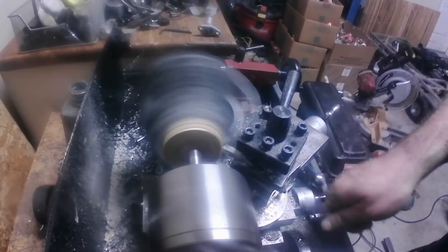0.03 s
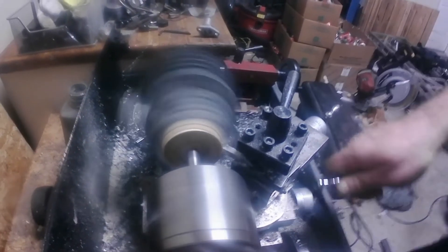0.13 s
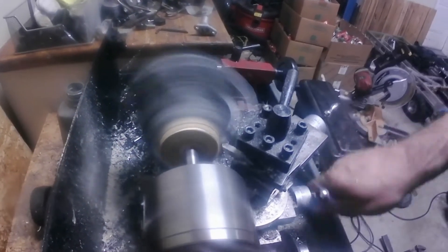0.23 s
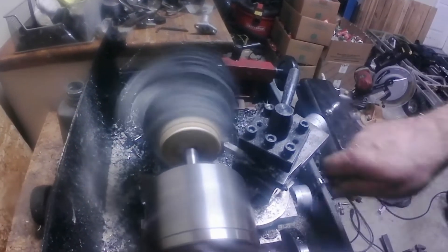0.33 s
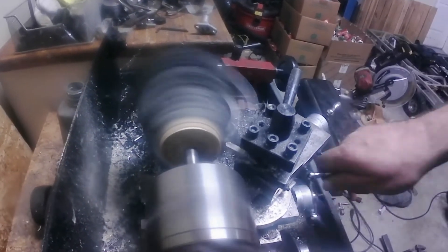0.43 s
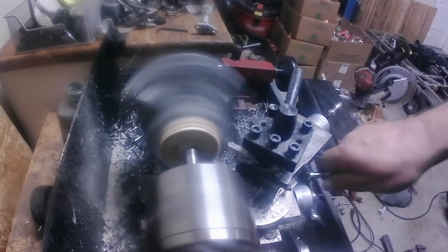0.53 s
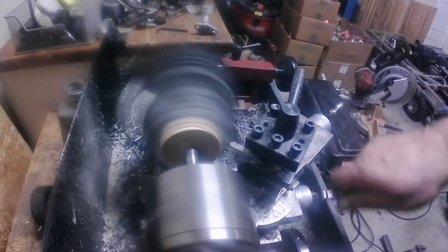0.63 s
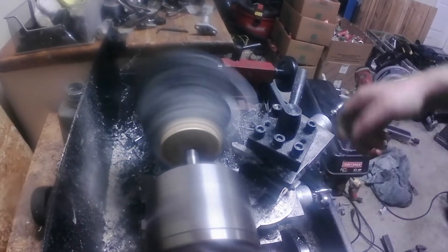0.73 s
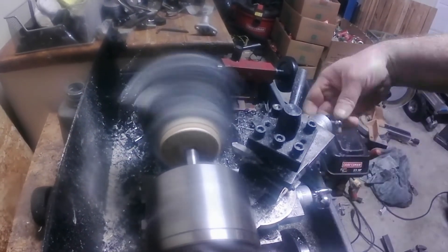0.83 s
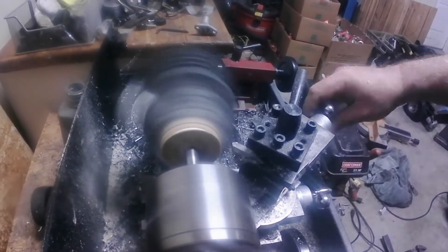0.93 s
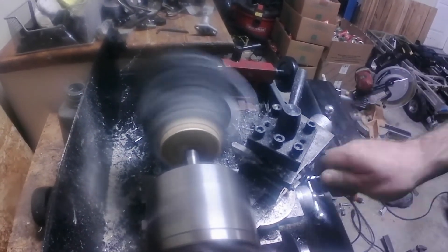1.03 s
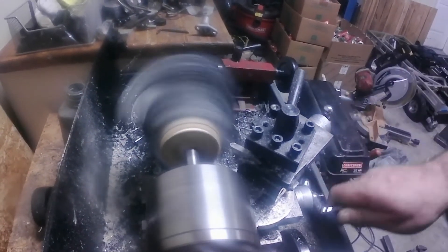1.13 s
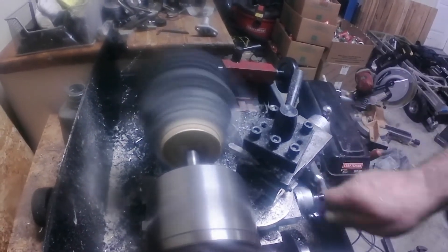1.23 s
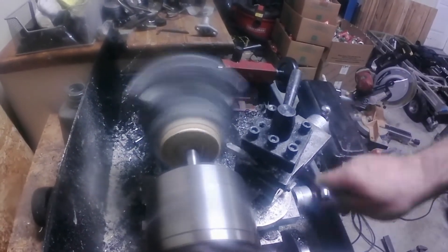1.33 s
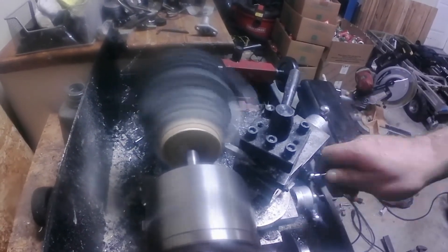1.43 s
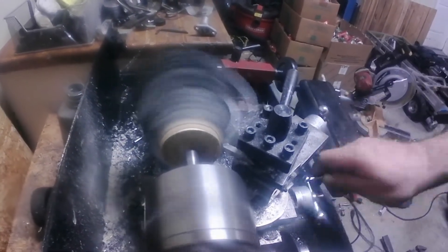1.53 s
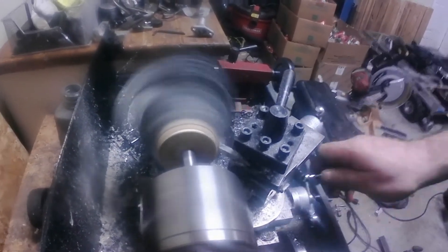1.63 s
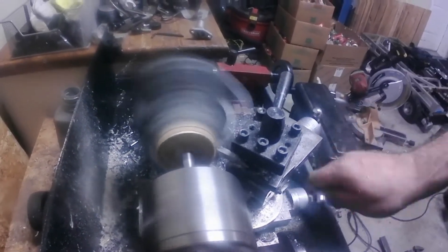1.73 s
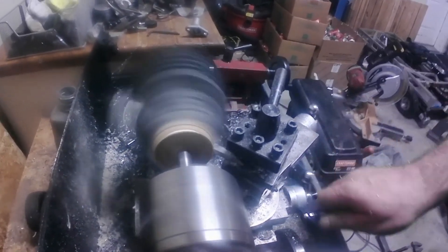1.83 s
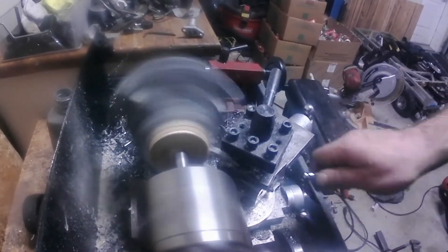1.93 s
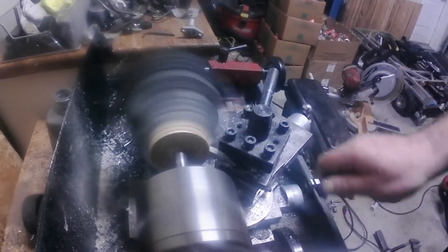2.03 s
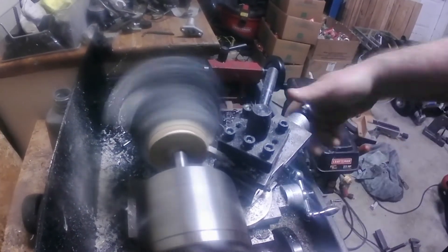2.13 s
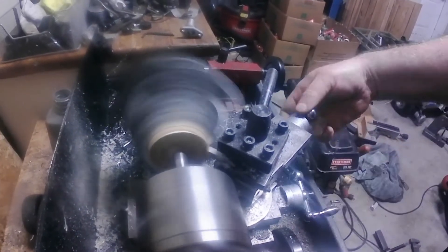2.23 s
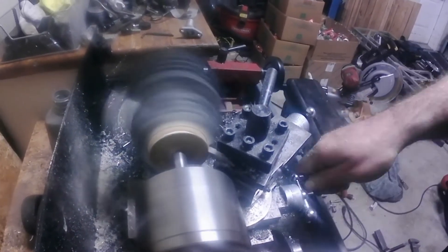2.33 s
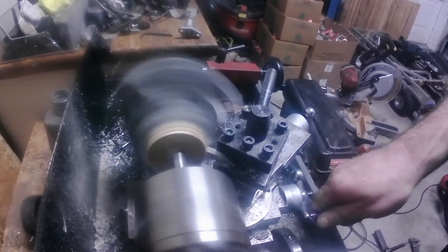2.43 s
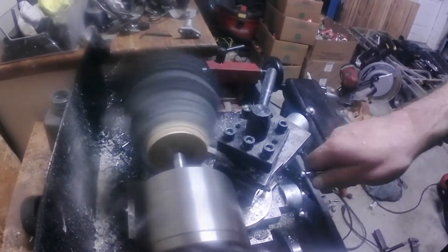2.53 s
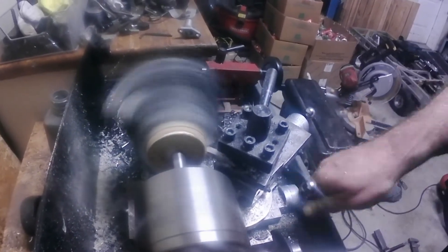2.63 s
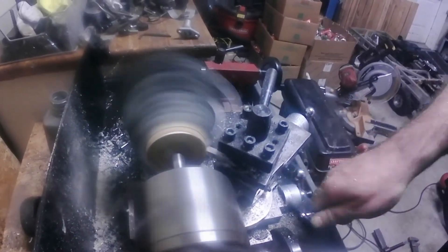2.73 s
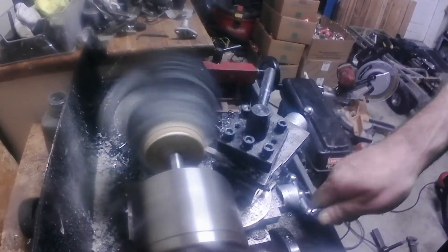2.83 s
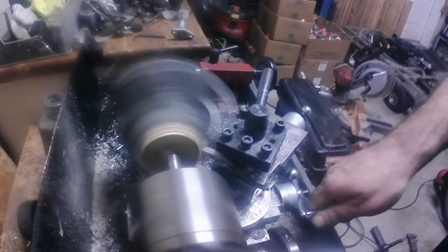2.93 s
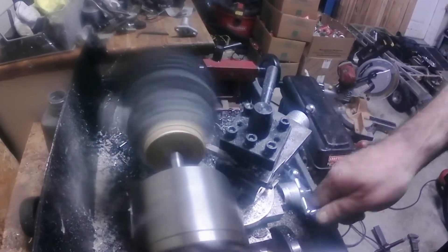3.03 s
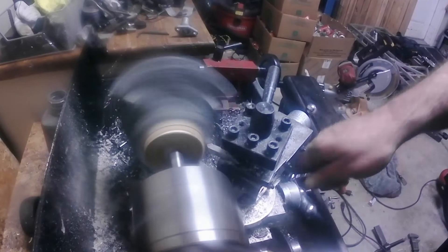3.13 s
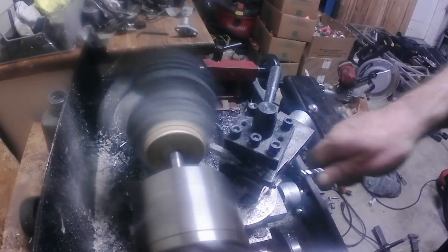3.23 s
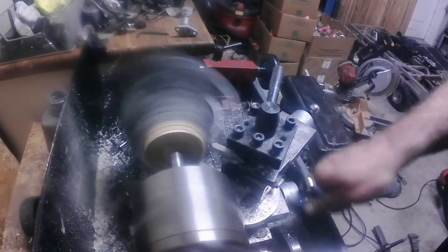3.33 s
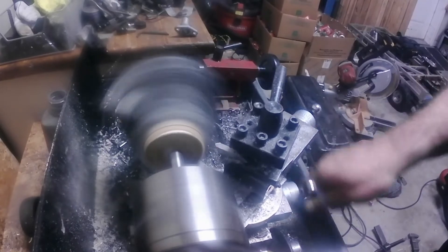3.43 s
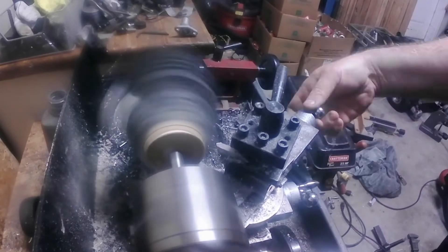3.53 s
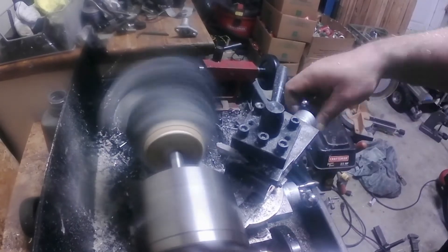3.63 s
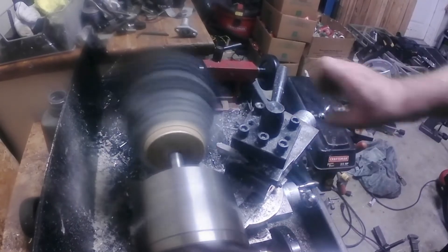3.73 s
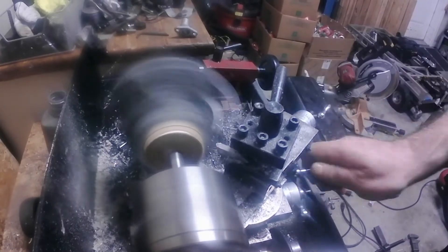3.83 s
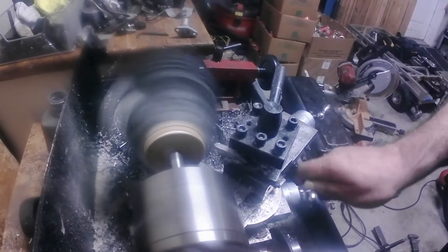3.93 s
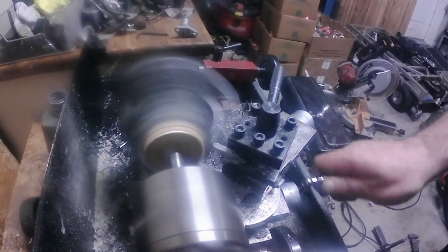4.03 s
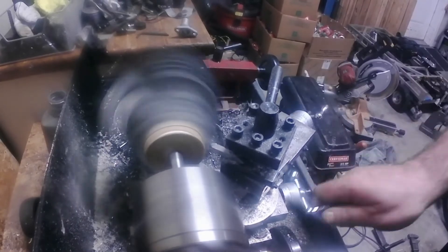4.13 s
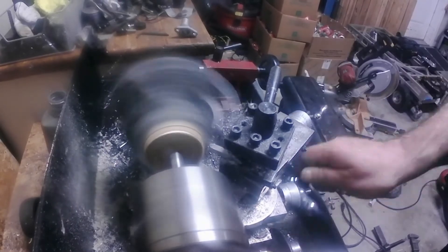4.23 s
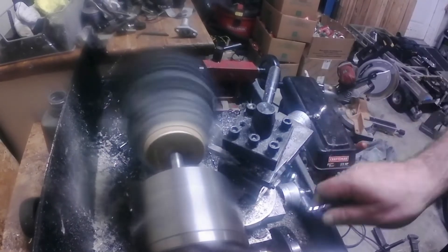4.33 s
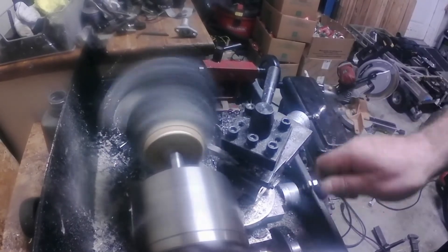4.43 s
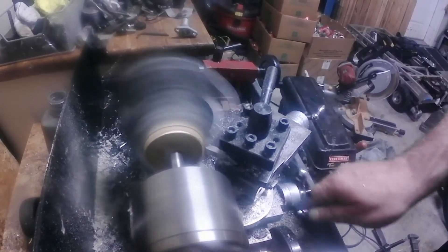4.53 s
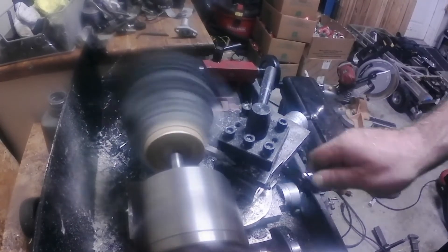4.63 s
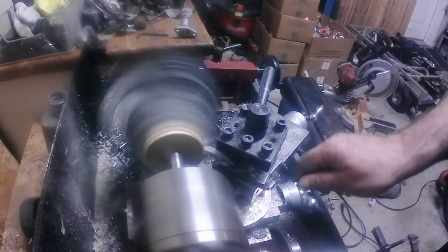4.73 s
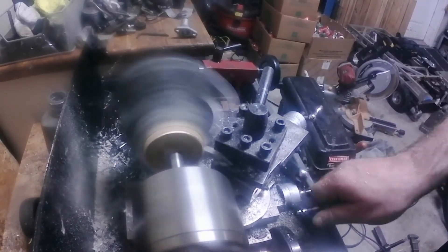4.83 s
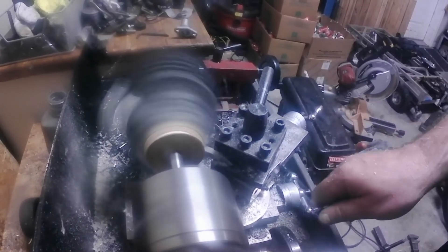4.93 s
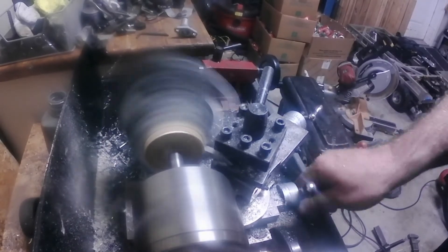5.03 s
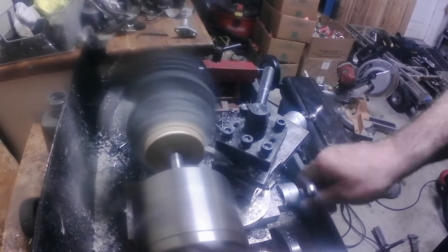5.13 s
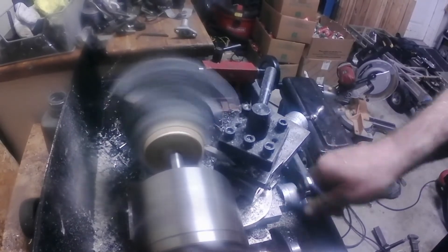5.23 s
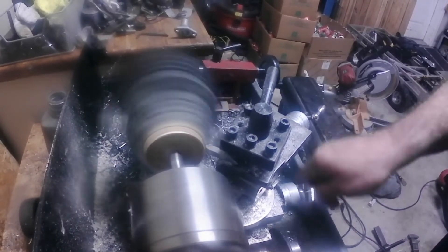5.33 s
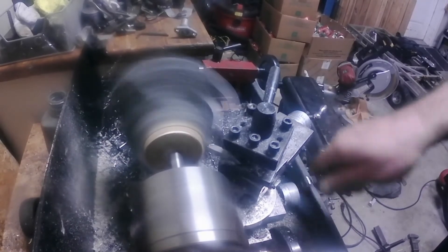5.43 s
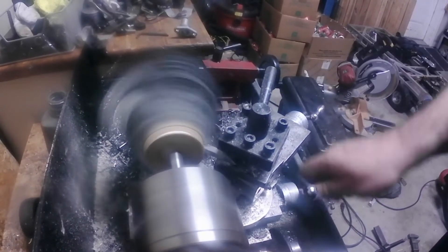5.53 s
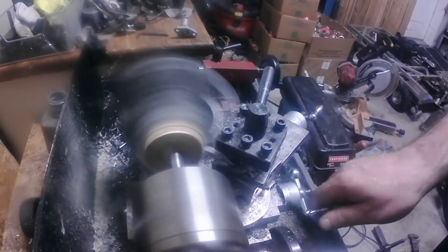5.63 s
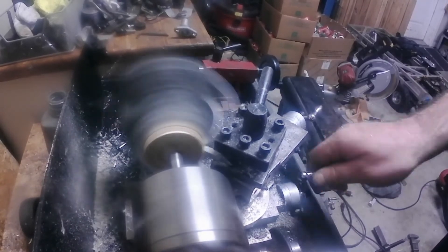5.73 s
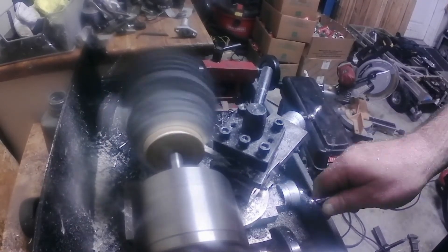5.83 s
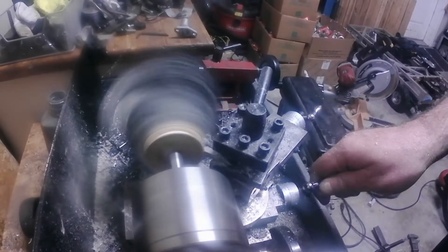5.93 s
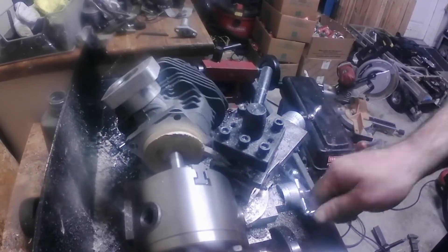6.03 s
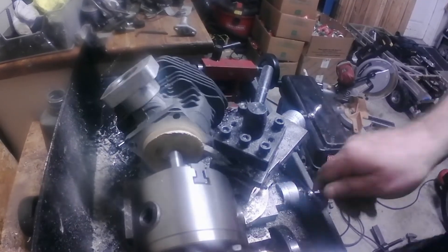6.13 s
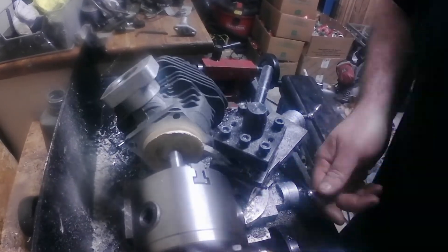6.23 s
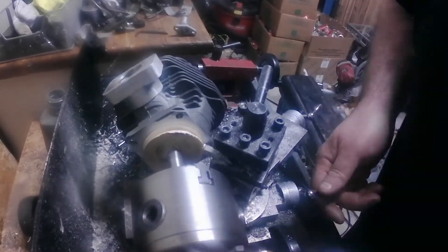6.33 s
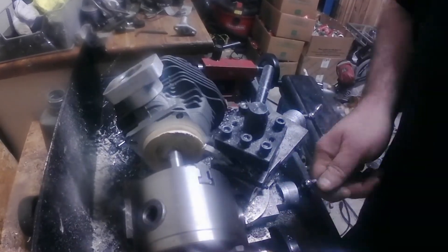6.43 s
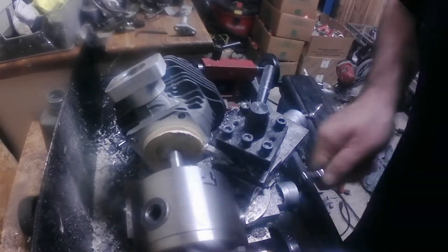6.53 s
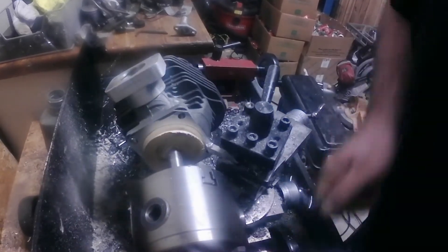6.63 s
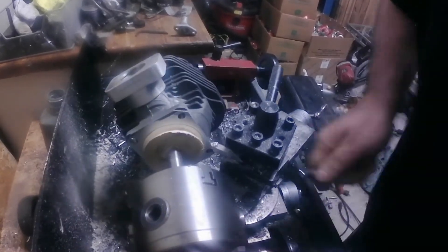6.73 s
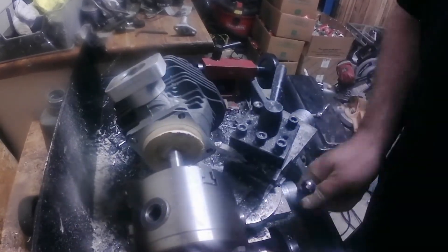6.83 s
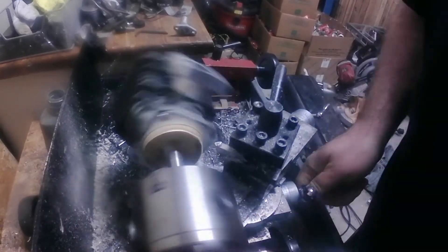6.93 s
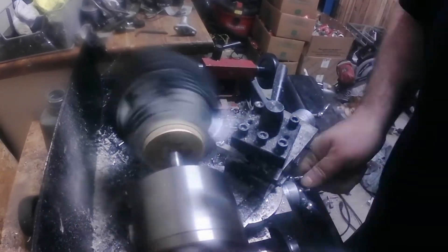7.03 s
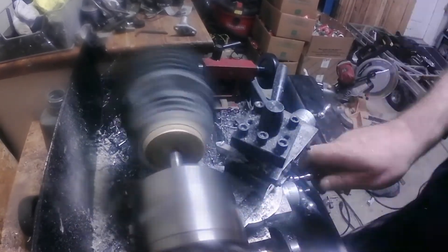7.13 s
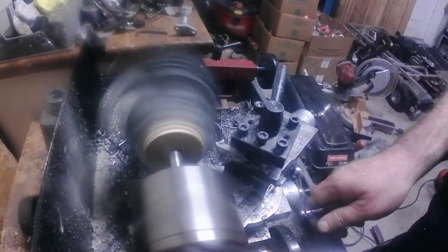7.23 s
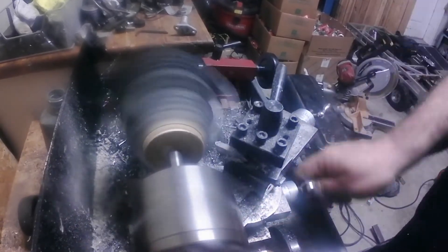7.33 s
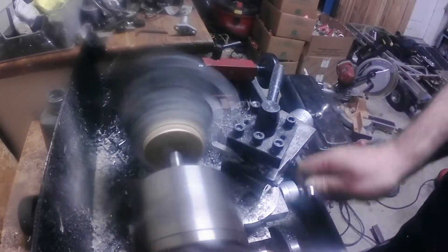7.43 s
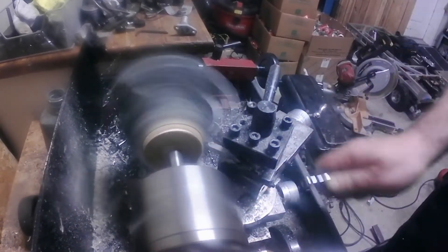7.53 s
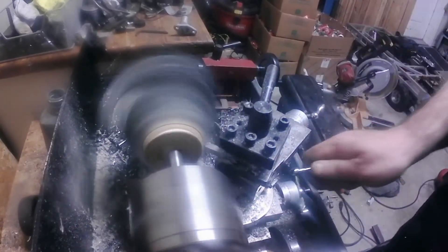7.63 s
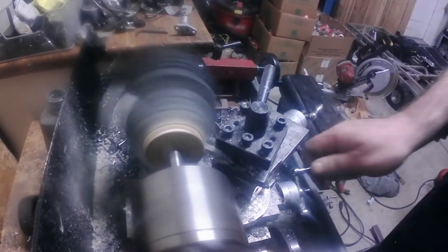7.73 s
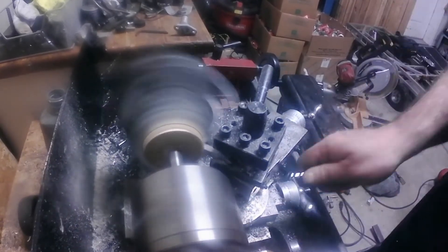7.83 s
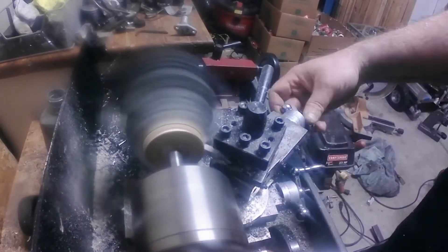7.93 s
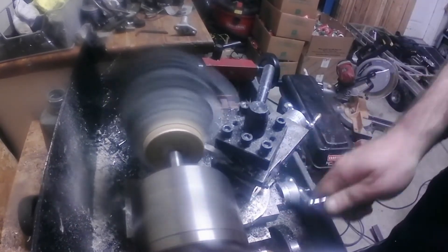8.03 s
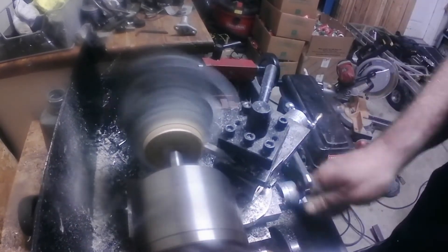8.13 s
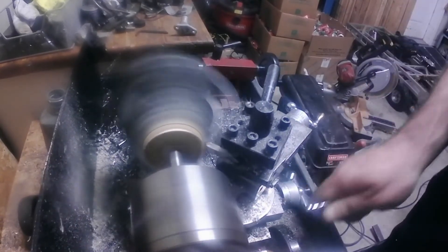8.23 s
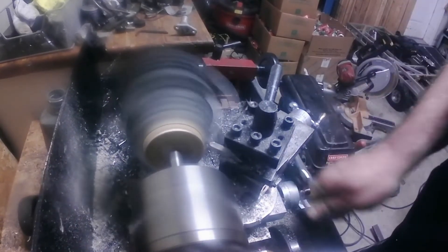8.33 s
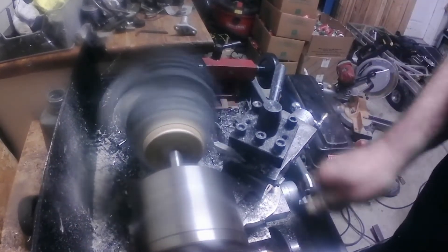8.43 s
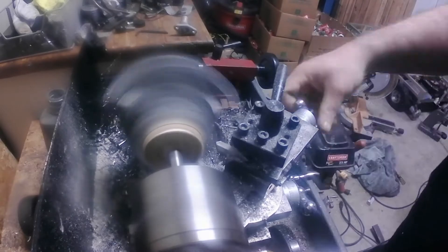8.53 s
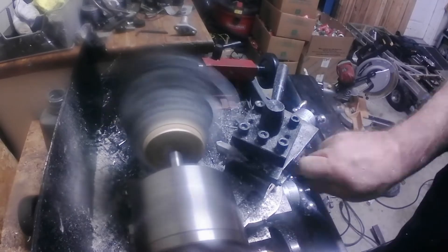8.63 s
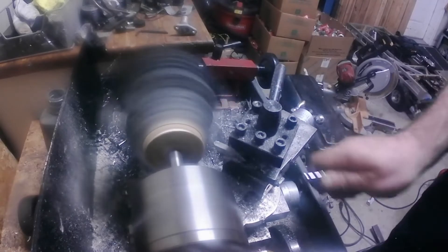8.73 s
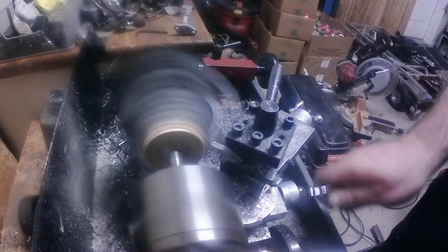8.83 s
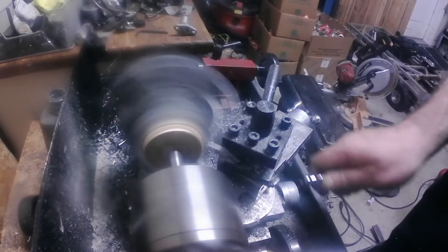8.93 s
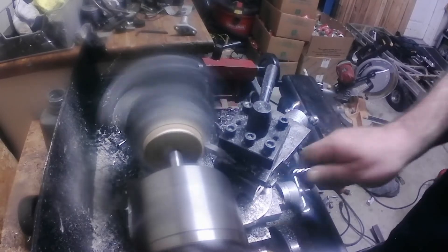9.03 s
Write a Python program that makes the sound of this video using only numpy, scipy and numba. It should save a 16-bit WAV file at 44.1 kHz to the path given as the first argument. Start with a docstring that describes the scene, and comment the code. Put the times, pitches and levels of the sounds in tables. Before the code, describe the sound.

Harsh high metallic screeching from a lathe tool, with a lower ringing note from its holder and a sizzling hiss of chips. It swells, drops and stutters irregularly. The spindle stops abruptly, leaving near silence with tiny clicks and a few scraping jerks, then restarts with a faster buzz and thin motor whine. Close, dry, single-channel sound in a workshop, crunchy at the loudest moments.

```python
"""A small lathe heard close by: blows of the tool on a spinning casting ring two steel resonances into a squeal.
The cut flips between regular chatter (a harmonic knock pattern) and rough scraping (throbbing noise).
Coloured noise makes the hiss of chips, sines make a thin motor whine.
The spindle halts for a second, with ticks and short jerks over faint workshop noise, then runs faster.
The little microphone overloads on the peaks."""
import sys
import numpy as np
from scipy import signal
from scipy.fft import rfft, irfft
from scipy.io import wavfile
from scipy.ndimage import uniform_filter1d
from numba import njit

SR = 44100
rng = np.random.default_rng(int(sys.argv[2]) if len(sys.argv) > 2 else 0)


def master(y):
    """Save y as 16-bit WAV."""
    cut = np.clip(np.atleast_2d(y).T, -1, 1)
    pcm = np.round(cut * 32767)  # scale
    wavfile.write(sys.argv[1], SR, pcm.astype(np.int16))


def voltage_ratio(level):
    """Linear amplitude factor for a level in decibels (scalar or array-like)."""
    return 10 ** (np.asarray(level, float) / 20)


N = 399987
t = np.arange(N) / SR

# tool squeal while the spindle turns: start_s, gain_db
SQUEAL = [(0.0, -23.5), (0.23, -16.5), (0.37, -21), (0.49, -9), (0.55, -10.5), (0.62, -19.5), (0.65, -12),
          (0.69, -31.5), (0.89, -32), (0.93, -20), (1.04, -24), (1.18, -8.5), (1.33, -18), (1.46, -13.5),
          (1.5, -17), (1.88, -20.5), (1.9, -13.5), (1.98, -21.5), (2.15, -12.5), (2.32, -10.5),
          (2.37, -2.5), (3.11, -5), (3.23, -18.5), (3.38, -9), (3.46, -29.5), (3.6, -29), (3.75, -14),
          (3.82, -25), (3.87, -12), (3.95, -6.5), (4.1, -12.5), (4.34, -10), (4.69, -17), (5.08, -2.5),
          (5.32, -17), (5.35, -12.5), (5.48, -13.5), (5.5, -23.5), (5.67, -12.5), (5.68, -21), (5.9, -9),
          (6.04, -15), (7.13, -42), (7.236, -24.5), (7.338, -34.5), (7.398, -10.5), (7.484, -8),
          (7.86, -22), (8.054, -15), (8.064, -24), (8.248, -14.5), (8.274, -17.5), (8.424, -11),
          (8.484, -27.5), (8.694, -28.5), (8.768, -6), (8.844, -6.5), (8.946, -13), (9.016, -9.5),
          (9.06, -21.5)]


def level(x, db):
    """Scale to an rms level."""
    return x * voltage_ratio(db) / np.sqrt(np.mean(x ** 2))


def curves(rows):
    """Columns of a table joined by straight lines in time."""
    s, *columns = np.transpose(rows)
    return [np.interp(t, s, c) for c in columns]


def coloured(points):
    """Noise with a given spectrum, interpolated over log frequency."""
    hz, db = np.transpose(points)
    f = np.arange(N // 2 + 1) * SR / N + 1
    gain = voltage_ratio(np.interp(np.log(f), np.log(hz), db))
    return irfft(rfft(rng.standard_normal(N)) * gain, N)


def walk(rate_hz):
    """Random levels, rate_hz a second, joined smoothly; spread near 1."""
    draws = rng.standard_normal(int(N * rate_hz / SR) + 2)
    points = uniform_filter1d(np.repeat(draws, 8), size=8)
    return 1.2 * np.interp(t * rate_hz * 8, np.arange(len(points)), points)


@njit
def svf(x, hz, width):
    """State-variable band-pass with moving centre and width, gain 1 at the centre."""
    y, b, l = np.empty(len(x)), 0., 0.
    for i in range(len(x)):
        g, k = np.tan(np.pi * hz[i] / SR), width[i] / hz[i]
        v = (b + g * (x[i] - l)) / (1 + g * (g + k))
        b, l, y[i] = 2 * v - b, l + 2 * g * v, k * v
    return y


def ring(x, hz, width_hz):
    """A resonance applied twice for dark valleys; white noise of rms 1 leaves with rms 1."""
    hz, width_hz = hz + 0 * t, width_hz + 0 * t
    twice = svf(svf(x, hz, width_hz), hz, width_hz)
    return twice * np.sqrt(2 * SR / (np.pi * width_hz))


def bumps(rows):
    """Flat-topped bumps from rows of time, nominal length and height."""
    return sum(height * np.exp(-((t - s) / (0.72 * length)) ** 4) for s, length, height in rows)


def held(start_s, length_s):
    """Gain of a contact: quick attack, hold, steady decay in dB."""
    attack_db_per_s, release_db_per_s = 7000, 1396
    before = np.maximum(start_s - t, 0)
    after = np.maximum(t - start_s - length_s, 0)
    return voltage_ratio(-attack_db_per_s * before - release_db_per_s * after)


def cutting():
    """The blows ring tool, holder and casting; chips hiss across the whole range."""
    # resonances shift with the load: start_s, tool_hz, holder_hz
    steel = [(0, 5780, 2374), (.24, 5770, 2290), (.33, 6020, 2437), (1.47, 6095, 2482), (1.62, 5700, 2287),
             (1.84, 6100, 2304), (2.3, 6170, 2345), (2.5, 5970, 2347), (3.03, 5990, 2390),
             (3.15, 6070, 2453), (3.6, 6000, 2390), (4.2, 6120, 2457), (5.05, 6140, 2403),
             (6.05, 6040, 2440), (6.4, 5580, 2303), (7.7, 5820, 2346), (8.5, 5905, 2374),
             (9.07, 5840, 2333)]
    # weaker modes of tool and casting: centre_hz, width_hz, scraped_db, knocked_db (at hardness 0)
    body_modes = [(2798, 110, -36.5, -24.5), (3720, 1500, -33.5, -25), (4730, 440, -38, -20),
                  (4996, 286, -20, -38), (5550, 320, -51, -20.5), (7000, 3000, -27.5, -31),
                  (9510, 65, -23, -22), (10910, 900, -16, -25)]
    # hiss spectrum: freq_hz, relative_db_per_hz
    hiss_colour = [(25, -17), (200, -17.5), (1200, -17.5), (1700, -12), (3500, -14), (6500, -15),
                   (8600, -15), (12000, -9), (15800, -7)]
    # brief dips: centre_s, nominal_length_s, depth (each layer takes its own dB per unit)
    dip_rows = [(0.065, 0.023, 8), (0.155, 0.0044, 26), (0.261, 0.0063, 10), (0.318, 0.012, 8),
                (0.474, 0.012, 7.5), (0.6, 0.016, 8.5), (1.118, 0.0076, 6), (1.579, 0.0093, 6.5),
                (2.011, 0.018, 3), (2.439, 0.0068, 9), (2.63, 0.015, 6), (2.694, .03, 4.5),
                (2.944, 0.016, 6), (3.059, 0.0076, 9), (3.143, 0.025, 5), (3.26, 0.016, 4.5),
                (3.684, 0.014, 18), (3.823, 0.0073, 7), (3.869, 0.0079, 5), (3.95, 0.017, 9),
                (4.316, 0.027, 5), (4.36, .025, 5.5), (4.461, 0.025, 4.5), (4.895, 0.024, 4),
                (5.115, 0.035, 5), (7.155, 0.081, 5), (7.729, 0.017, 5.5), (7.857, 0.01, 5),
                (7.892, 0.015, 15.5), (8.287, 0.011, 3.5), (8.344, 0.0051, 8.5), (8.52, 0.037, 10.5),
                (8.68, 0.011, 8.5), (8.735, 0.0099, 4.5), (8.899, 0.034, 5), (9.012, 0.013, 6.5)]
    regular, hard_db = chatter()
    tool_gain, holder_gain, hiss_gain = contact(regular)
    tool_hz, holder_hz = curves(steel)

    # ten more small dips at random: mean length 13 ms, mean depth 3
    faint = [(s * N / SR, .013 * (.5 + a), 3 * (.5 + b)) for s, a, b in rng.random((10, 3))]
    dip = bumps(dip_rows + faint)
    knocks, scrape = blows(regular, hard_db)
    # only a deep dip touches the knocks here
    knocks = knocks * voltage_ratio(-.8 * np.maximum(dip - 13, 0))
    scrape = scrape * voltage_ratio(-.45 * dip)

    # a knock lasts too long to push much above the tool's note
    dull = svf(knocks, 0.89 * tool_hz, 1700 + 0 * t) * voltage_ratio(3.0)
    # hard contact damps the tool: shorter rings, wider band
    knock_width_hz = 750 * voltage_ratio(hard_db / 4)
    tool = voltage_ratio(-1.5) * ring(dull, 1.009 * tool_hz, knock_width_hz)
    tool = tool + ring(scrape, tool_hz, 620)

    body = 0
    for hz, width_hz, scraped_db, knocked_db in body_modes:
        force = voltage_ratio(scraped_db - dip) * scrape
        force = force + voltage_ratio(knocked_db + hard_db - 0.79 * dip) * knocks
        body = body + ring(force, hz, width_hz)

    holder = voltage_ratio(-3.0) * ring(knocks, holder_hz, 130) + ring(scrape, holder_hz, 100)
    holder = holder + voltage_ratio(-9.5) * ring(scrape, holder_hz, 350)
    # broad skirt below the holder's note
    holder = holder + voltage_ratio(-11) * ring(knocks + voltage_ratio(-dip) * scrape, 0.952 * holder_hz, 510)

    flicker_db = 1.2 * walk(25)
    hiss = level(coloured(hiss_colour), 3.7) * hiss_gain * voltage_ratio(-2.12 * dip + flicker_db)
    return tool_gain * (tool + body) + holder_gain * holder + hiss


def blows(regular, hard_db, throb=0.4):
    """Two forces on the tool tip: a repeating knock pattern, and scraping that throbs at the same rate."""
    # knock rate sags under a long bite, is higher after the restart: start_s, rate_hz
    speed = [(.15, 205), (.3, 206.2), (.57, 206.1), (.66, 205.6), (.9, 206.3), (1.13, 205.9), (1.48, 204.6),
             (3.22, 206.2), (3.82, 206.1), (4.3, 204.5), (5.5, 206.3), (7.1, 206), (7.3, 222),
             (7.43, 228.2), (7.51, 229.8), (7.86, 232.6), (7.98, 231.6), (8.25, 230.5), (8.38, 232.1),
             (8.66, 232.2), (8.86, 229.5)]
    odd_db, wander_db, smear_rad = -6, 3.6, .5
    (rate_hz,) = curves(speed)
    turn = np.exp(2j * np.pi * np.cumsum(rate_hz) / SR)
    knocks, partial = 0, turn ** 6
    for k in range(7, 58):
        partial = partial * turn
        # two unequal knocks a cycle favour the even partials, one hard knock does not
        parity_db = (odd_db + hard_db / 2) * (k % 2)
        # the pattern slowly changes shape
        size = voltage_ratio(parity_db + wander_db * walk(16))
        knocks = knocks + size * (partial * np.exp(1j * smear_rad * walk(10))).real
    scrape = (1 + throb * turn.real) * rng.standard_normal(N)
    return np.sqrt(regular) * level(knocks, -1.74), np.sqrt(1 - regular) * level(scrape, 0)


def chatter():
    """Regularity and knock hardness, cross-faded in and out of each spell."""
    # hardness is how much the casting joins in: start_s, length_s, regularity_0_to_1, hardness_db
    spells = [(.16, .19, .8, 7), (.35, .24, .92, 4), (.59, .085, .83, 10), (.905, .195, .7, 2),
              (1.1, .15, .95, 1), (1.25, .09, .88, 11), (1.34, .11, .5, 8), (3.19, .27, .9, 0),
              (3.655, .05, .8, 4), (3.83, .19, .93, -1), (4.02, .15, .72, 7), (4.17, .11, .4, 3),
              (5.47, .135, .7, 0), (7.35, .175, .93, 1), (7.845, .15, .9, 0), (8.27, .2, .9, -1),
              (8.47, .09, .6, -6), (8.67, .175, .93, 0)]
    rough_regularity, edge_s = .07, .04
    regular, hard_db = rough_regularity, 0
    for start_s, length_s, share, db in spells:
        to_edge_s = np.minimum(t - start_s, start_s + length_s - t)
        inside = np.clip(to_edge_s / edge_s + .5, 0, 1)
        regular = regular + (share - rough_regularity) * inside
        hard_db = hard_db + db * inside
    return np.clip(regular, 0, .96), hard_db


def scraping(regular):
    """Level in dB of the rough part of the cut."""
    return curves(SQUEAL)[0] + 10 * np.log10(1 - regular)


def contact(regular):
    """Gains of tool, holder and hiss: the running cut, then the jerks of the halted spindle."""
    # holder ring while the spindle turns: start_s, gain_db
    holder_rows = [(0.0, -30), (0.01, -25.5), (0.29, -19), (0.3, -25), (0.45, -31), (0.64, -18.5),
                   (0.69, -38.5), (1.02, -29.5), (1.16, -21), (1.26, -34.5), (1.38, -20), (1.6, -22.5),
                   (2.3, -23.5), (2.35, -29), (3.03, -25.5), (3.13, -17), (3.35, -28.5), (3.38, -24),
                   (3.58, -38.5), (3.75, -23.5), (3.82, -33), (3.92, -22.5), (4.0, -29.5), (4.2, -17.5),
                   (4.49, -23.5), (5.08, -20), (5.13, -40), (5.15, -29.5), (5.43, -21.5), (5.75, -29),
                   (5.92, -19), (6.04, -19.5), (7.13, -40), (7.15, -33.5), (7.678, -18.5), (7.806, -21.5),
                   (7.822, -29), (8.28, -20), (8.5, -26), (8.516, -46.5), (8.79, -15), (8.844, -23.5),
                   (8.962, -19), (9.06, -23.5)]
    # jerks against the tool: start_s, length_s, tool_db, holder_db, hiss_db
    jerks = [(6.376, 0.019, -21, -10, -7.5), (6.524, 0.023, -18.5, -11.5, -7.5),
             (6.98, 0.017, -39, -37, -41), (7.014, 0.021, -18.5, -12, -26), (7.031, 0.045, -14, -14.5, -9),
             (7.111, 0.0032, -26, -43, -45)]
    # the hiss surges: centre_s, nominal_length_s, rise_db
    surges = [(.08, 0.057, 4.5), (.3, 0.078, 4.5), (1.69, 0.11, 3.5), (4.93, 0.023, 9), (5.09, 0.023, 7),
              (6.02, 0.039, 8.5)]
    halt_s, restart_s = 6.045, 7.125
    tool_db = curves(SQUEAL)[0] + 1.5 * walk(25)
    holder_db = curves(holder_rows)[0] + 1.22 * walk(20)
    # chips hiss louder the harder the tool scrapes; faster chips hiss more
    hiss_db = -16.5 + 0.3648 * scraping(regular) + 2 * (t > restart_s)
    running = held(0, halt_s) + held(restart_s, N / SR)
    gains = voltage_ratio(np.array([tool_db, holder_db, hiss_db])) * running
    # the holder rings on a little longer after a jerk: gentler slopes
    slope_share = np.array([[1], [0.72], [1]])
    for start_s, length_s, *dbs in jerks:
        gains = gains + voltage_ratio(np.array(dbs))[:, None] * held(start_s, length_s) ** slope_share
    tool, holder, hiss = gains
    return tool, holder, hiss * voltage_ratio(bumps(surges))


def motor():
    """Thin, steady tones of the drive that waver a little in level."""
    # drive tones: freq_hz, relative_db
    tones = [(1920, -43), (3840, -62.5)]
    # whine through halt and restart: start_s, gain_db
    drive = [(6.05, 3), (6.08, -38), (6.2, -60), (6.23, -28), (6.35, -21), (6.4, -40), (7.1, -49), (7.2, 5),
             (8, 10), (9.07, 6.5)]
    # the whine thins under hard scraping
    load_db = np.clip(scraping(chatter()[0]) + 18, -12, 12)
    db = curves(drive)[0] - 0.08 * load_db
    out = 0
    for hz, tone_db in tones:
        out = out + voltage_ratio(db + tone_db + 1.5 + 0.5 * walk(4.4)) * np.sin(2 * np.pi * hz * t)
    return out


def ticks():
    """Small parts tick: a sharp click, a faint bright tail from the bench, and the holder ringing out."""
    # ticks about the halt: start_s, relative_click_db, relative_holder_db
    tick_rows = [(6.1097, -16, -33), (6.127, -19.5, -52), (6.2236, -23, -60), (6.3125, -23.5, -72),
                 (6.4677, -26, -64), (6.4888, -23.5, -60), (6.687, -50, -44), (6.786, -23, -31.5),
                 (6.818, -54, -49), (6.859, -55, -47), (6.9016, -21.5, -64), (6.9197, -21.5, -68),
                 (6.998, 5, -5.5), (7.013, -7.5, -23), (7.0923, -13, -27), (7.1165, -20, -36)]
    # click modes: freq_hz, relative_db, decay_s
    modes = [(12700, 3, 0.00013), (6070, -5.5, 0.0009)]
    out, u = np.zeros(N), t[:4096]
    click = sum(voltage_ratio(db) * np.sin(2 * np.pi * hz * u) * np.exp(-u / decay_s) for hz, db, decay_s in modes)
    click = np.diff(click, prepend=0)  # a tiny part radiates no bass
    holder = np.sin(2 * np.pi * 2370 * u) * np.exp(-u / 0.0092)
    for start_s, click_db, holder_db in tick_rows:
        i = int(start_s * SR)
        tail = voltage_ratio(-27.5) * np.diff(rng.standard_normal(4096), prepend=0) * np.exp(-u / 0.013)
        out[i:i + 4096] += voltage_ratio(click_db + 6.0) * (click + tail) + voltage_ratio(holder_db - 1.5) * holder
    return out


def workshop():
    """Faint background: coloured noise of wavering level."""
    # level course: start_s, relative_db
    shop_rows = [(6.1, -73.5), (6.2, -68), (6.58, -76), (6.64, -62), (6.66, -77), (6.687, -59), (6.71, -64),
                 (6.78, -62.5), (6.86, -62), (6.89, -71), (6.97, -78)]
    # spectrum: freq_hz, relative_db_per_hz
    shop_colour = [(40, -49), (250, -26), (400, -10), (520, -19.5), (1570, -24), (2150, -23.5), (2380, -6),
                   (2700, -21), (15800, -28.5)]
    (shop_db,) = curves(shop_rows)
    return level(coloured(shop_colour), 6.9) * voltage_ratio(shop_db + 2.5 * walk(33))


def scene():
    """All sources, one channel."""
    return (cutting() + motor() + ticks() + workshop())[None]


def roll_off(x):
    """The treble ends steeply here."""
    return signal.sosfilt(signal.butter(12, 16070, fs=SR, output="sos"), x)


def record(dry):
    """The microphone input flattens the loudest peaks; a low-pass then removes the treble above 15.8 kHz."""
    soft = dry / (1 + np.abs(dry / 0.89) ** 4) ** (1 / 4)
    # order, ripple_db, stopband_db, edge_hz
    low_pass = signal.ellip(10, .3, 70, 15830, fs=SR, output="sos")
    mix = signal.sosfilt(low_pass, soft)
    return roll_off(mix)


dry = scene()
out = record(dry)
master(out)
```